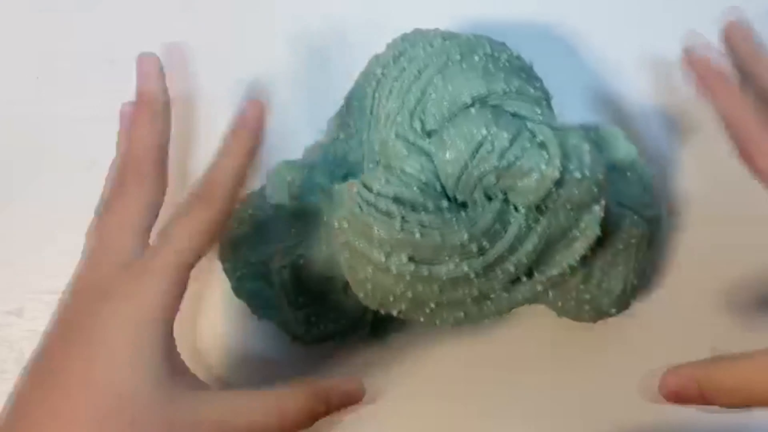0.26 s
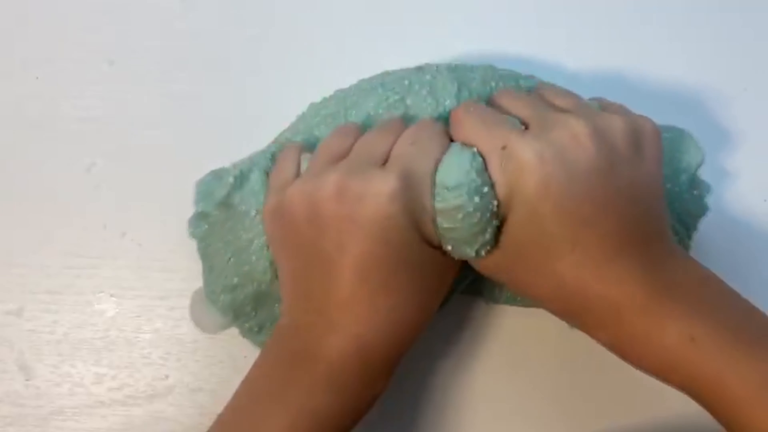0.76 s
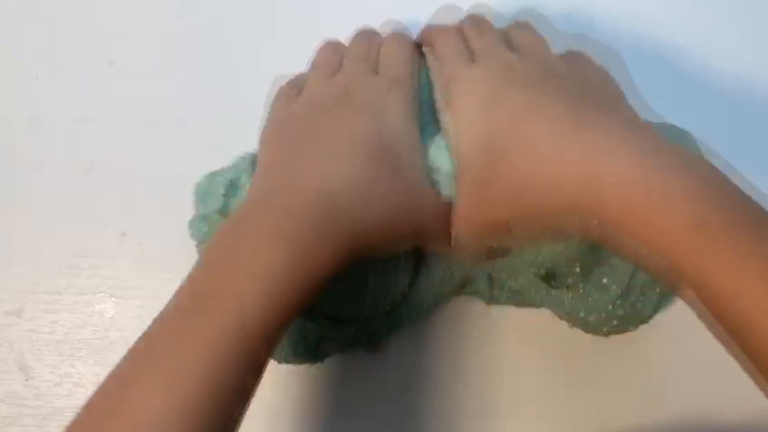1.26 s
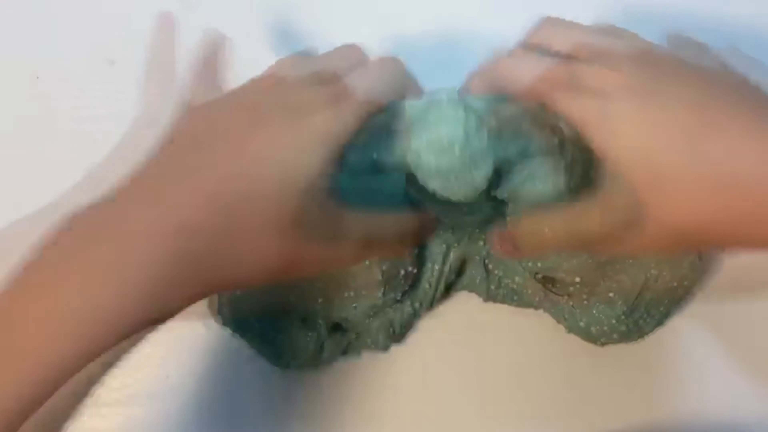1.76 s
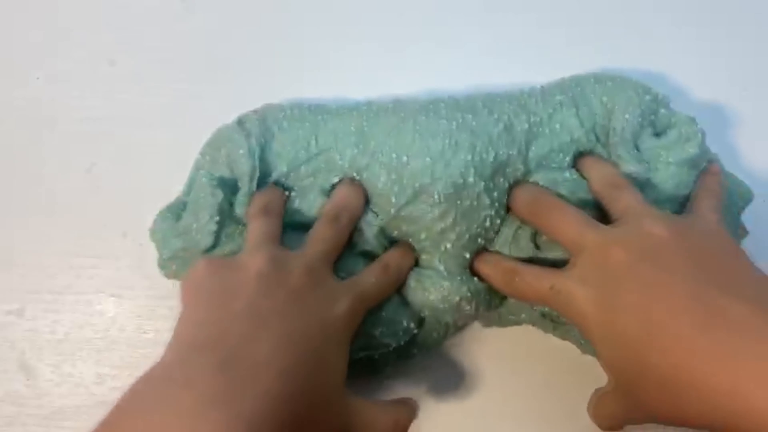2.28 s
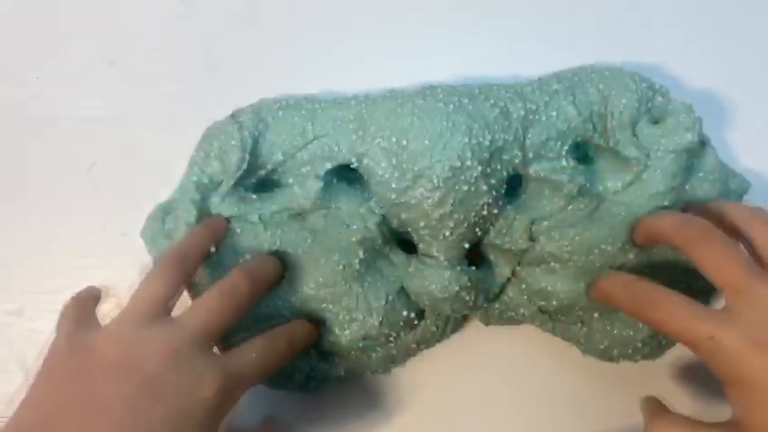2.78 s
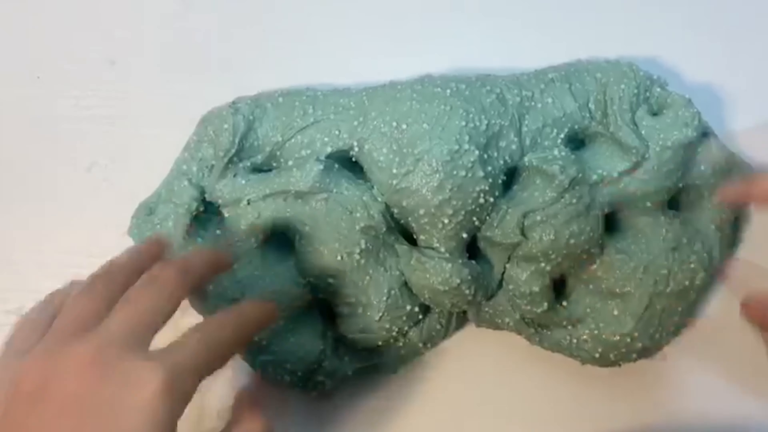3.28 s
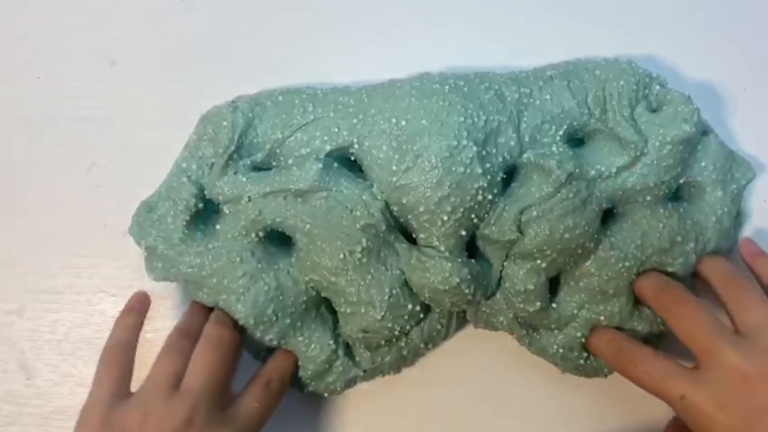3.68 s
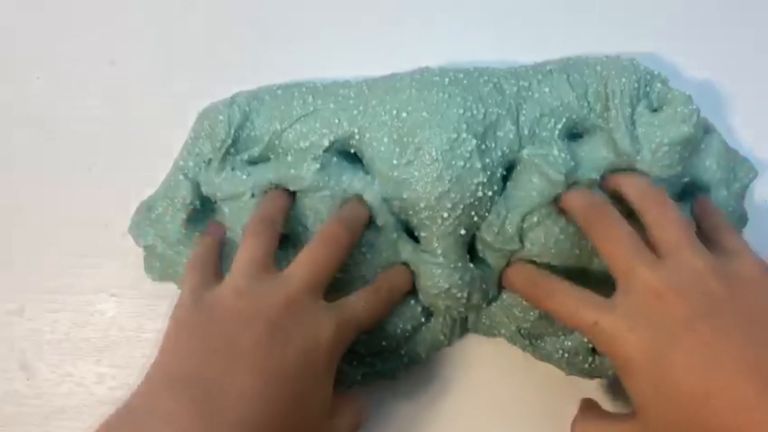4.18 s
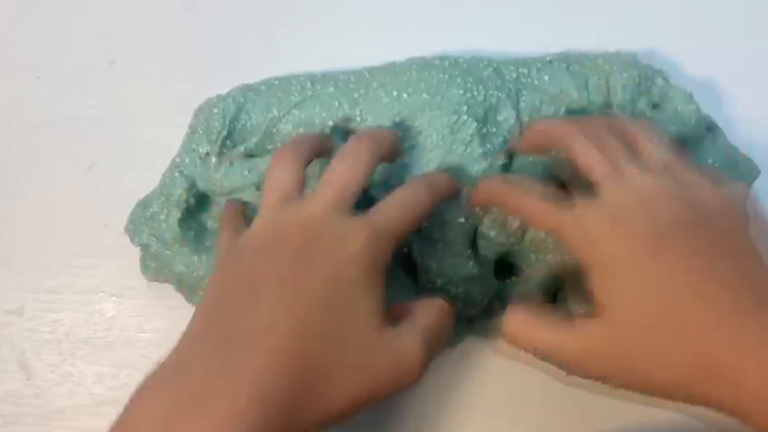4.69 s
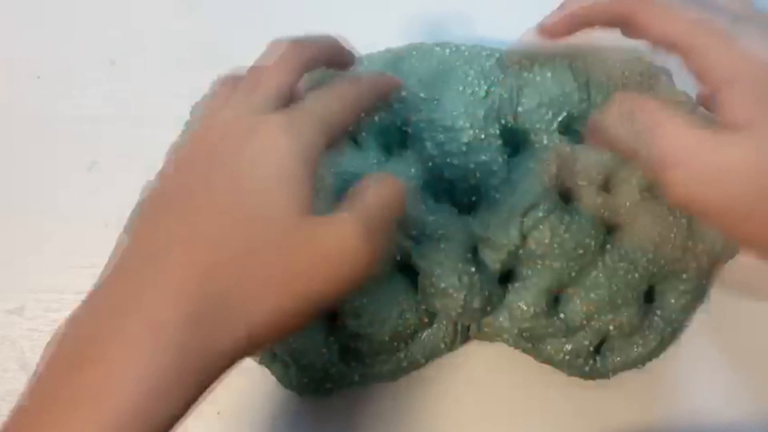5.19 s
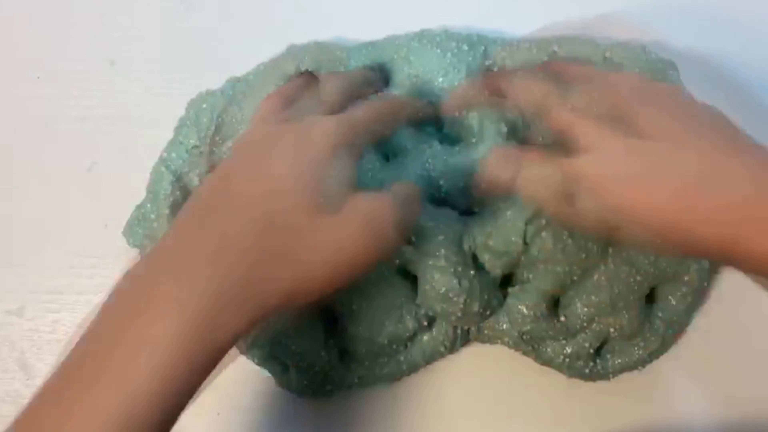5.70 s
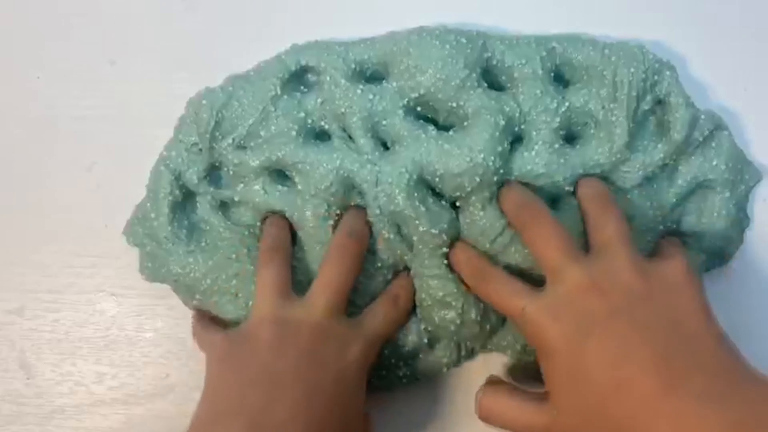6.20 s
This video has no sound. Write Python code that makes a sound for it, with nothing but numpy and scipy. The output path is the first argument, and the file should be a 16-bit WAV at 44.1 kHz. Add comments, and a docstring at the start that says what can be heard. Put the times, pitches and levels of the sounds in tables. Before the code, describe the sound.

Close-up crunchy slime: squelching presses and crackling sticky peels, followed by seven spaced finger pokes, each a dull thud with popping beads.

```python
"""Two hands work a slab of foam-bead slime on a table, close to a two-port microphone in a small quiet room.
For the first two seconds they press it and peel away: crunching beads, wet squelches, sharp sticky snaps.
From 2.5 s the fingers poke in seven times: each touches and sinks with thuds, gulps, a squelch and a burst
of snaps, then lifts out with sticky ticks. Filtered noise, random clicks and short decaying tones make
these sounds; nearby reflections, a wide room tail and still air surround them throughout."""
import sys
import numpy as np
from scipy import signal
from scipy.fft import rfft, irfft, next_fast_len
from scipy.io import wavfile

SR = 44100
rng = np.random.default_rng(int(sys.argv[2]) if len(sys.argv) > 2 else 0)


def dump(signal):
    """Clip the signal to [-1, 1] and save it as 16-bit WAV at the path in sys.argv[1]."""
    limited = np.clip(np.atleast_2d(signal).T, -1, 1)
    pcm = np.round(limited * 32767).astype(np.int16)
    wavfile.write(sys.argv[1], SR, pcm)


N = 284445
TIME = np.arange(N) / SR

# slow presses and soft rubs with the flat hand; levels are set before the layer gains:
# (peak t/s, rise/s, fall/s, crunch level/dB, fold f/Hz, squelch level/dB, fizz level/dB, weight on table level/dB)
FLAT_HAND_PRESSES = [(.008, 0.042, 0.022, -42, 1492, -45, -57.5, -55),
                     (.06, 0.024, 0.048, -58, 2224, -58.5, -62, -59),
                     (.152, 0.032, 0.034, -48, 3042, -47, -51, -40),
                     (0.197, 0.018, 0.0049, -54, 1990, -45, -64, -35),
                     (0.959, 0.016, 0.026, -53.5, 3646, -51.5, -59, -74),
                     (1.006, 0.018, 0.019, -48, 3486, -44, -52, -66),
                     (1.044, 0.019, 0.014, -48.5, 2415, -45, -46, -70),
                     (1.702, 0.016, 0.04, -55, 4530, -51.5, -61, -78),
                     (1.747, .03, 0.024, -50, 1800, -51.5, -55.5, -61),
                     (1.841, 0.036, 0.041, -63, 2460, -57.5, -73.5, -52.5),
                     (3.05, 0.21, 0.3, -87, 2426, -72.5, -93, -68),
                     (3.459, 0.013, 0.0088, -68, 1226, -69, -77.5, -43.5),
                     (3.56, 0.053, 0.076, -73.5, 2190, -85, -83, -77),
                     (3.75, 0.023, 0.04, -86, 1000, -62, -93, -58),
                     (5.533, 0.0065, 0.017, -72.5, 1600, -82, -81, -80)]


def gain_of(db):
    """Decibels to amplitude."""
    return 10 ** (np.asarray(db) / 20)


def evened(x):
    """Scales to unit rms."""
    return x / np.sqrt(np.mean(x ** 2) + 1e-20)


def read(points, hz):
    """Reads a table of (f/Hz, value) on a log-frequency axis."""
    f, value = np.transpose(points)
    return np.interp(np.log(hz + 1), np.log(f + 1), value)


def add(mix, s, sound):
    """Mixes a sound in at time s."""
    part = mix[max(0, round(s * SR)):][:len(sound)]
    part += sound[:len(part)]


def swell(s, rise_s, fall_s, shape=1):
    """An envelope that peaks at time s: pointed for shape 1, rounded for shape 2."""
    distance = abs(TIME - s) / np.where(TIME < s, rise_s, fall_s)
    return np.exp(-np.minimum(distance, 20) ** shape)


def clumps(depth_db, span_s):
    """Pockets give way in little avalanches: a gain that wanders between randomly spaced levels."""
    knots = np.cumsum(rng.exponential(span_s, 6000))
    levels = 2 * rng.random(len(knots)) - 1
    return gain_of(depth_db * np.interp(TIME, knots, levels))


def impulse(db):
    """The sharpest causal click that has this half spectrum, with unit energy."""
    log_gain = np.log(gain_of(np.concatenate([db, db[-2:0:-1]])))
    minimum_phase = np.exp(np.conj(signal.hilbert(log_gain)))
    click = np.fft.ifft(minimum_phase).real
    return click / np.linalg.norm(click)


def colour(x, points, size=2048):
    """Filters x by a relative spectrum, without smearing attacks backwards."""
    spectrum_db = read(points, np.fft.rfftfreq(size, 1 / SR))
    return signal.oaconvolve(x, impulse(spectrum_db))[:N]


def resonate(x, hz, width_hz):
    """A resonance that follows the curve hz: shift it to zero, smooth, and shift back."""
    turn = np.exp(2j * np.pi * np.cumsum(hz) / SR)
    r = np.exp(-np.pi * width_hz / SR)
    return 2 * (turn * signal.lfilter([1 - r], [1, -r], x / turn)).real


def burst(hz, octaves, size=512):
    """A tiny cavity opening: a click of a cycle or two around its own pitch."""
    away = np.log2((np.fft.rfftfreq(size, 1 / SR) + 50) / hz) / octaves
    return impulse(-22 * np.log10(1 + away ** 2))


def crackle(per_s, spread_db, low_hz, high_hz, octaves, clump_db=7.0, count=14):
    """A swarm of bursts at many pitches, with random strengths and signs; unit rms."""
    out = np.zeros(N)
    for hz in np.geomspace(low_hz, high_hz, count):
        size = np.minimum(rng.exponential(1, N), 3.5)
        strength = gain_of(spread_db * size) * rng.choice([-1, 1], N)
        happens = rng.random(N) < per_s / count / SR
        clicks = strength * happens * clumps(clump_db, span_s=0.0034)
        out += signal.oaconvolve(clicks, burst(hz, octaves))[:N] * np.sqrt(hz)
    return evened(out)


def pokes():
    """Touching and sinking each give a squeeze, a gulp and a thud; clinging and lifting give sticky pulls."""
    # fingertips touch the skin of the slab, sink through it, and lift out; levels before the layer gains:
    # (touch t/s, sink t/s, sink fade/s, touch level/dB, crunch level/dB, fold f/Hz, wet level/dB, fizz level/dB,
    #  thud level/dB, table ring level/dB re the sink thud, touch gulp f/Hz, sink gulp f/Hz, lift level/dB)
    finger_pokes = [(2.504, 2.538, 0.0065, -49, -38.5, 4295, -39.5, -40.5, -28.5, 2, 868, 475, -62),
                    (3.2039, 3.248, 0.0079, -40, -40.5, 5330, -36, -32.5, -25.5, 2, 903, 700, -68.5),
                    (3.8393, 3.868, 0.0044, -45.5, -41.5, 1935, -36.5, -39, -26, 1.5, 1209, 700, -67),
                    (4.479, 4.523, 0.015, -45.5, -41.5, 2656, -35, -36, -25, 2, 864, 541, -65.5),
                    (5.106, 5.1359, 0.0096, -46.5, -40.5, 3030, -36.5, -40.5, -27, 2, 906, 592, -83.5),
                    (5.6932, 5.726, 0.021, -46.5, -45.5, 6200, -37.5, -52, -30, 8, 926, 626, -67),
                    (6.279, 6.324, 0.0069, -50.5, -43.5, 3635, -36, -45, -31.5, -2.5, 1035, 762, -78)]
    touch_rise_s, touch_fade_s, sink_rise_s = 0.0046, 0.01, 0.0088
    touch_crunch_db, touch_wet_db, touch_fizz_db = -2.5, 4, -1  # against the touch level
    touch_gulp_lead_s, touch_gulp_db, touch_gulp_fall, touch_gulp_s = 0.005116, 11.5, 0.61, .014
    sink_gulp_lag_s, sink_gulp_db, sink_gulp_fall, sink_gulp_s = .004, 1, .72, .012
    thud_lag_s, touch_thud_hz, sink_thud_hz, sink_thud_db = .015, 100.5, 101, -4
    touch_ring_db = -3  # against the touch thud
    recoil_s = 0.052
    cling_lag_s, cling_rise_s, cling_fade_s, cling_db = 0.03, 0.013, .05, -18
    lift_after_s, lift_rise_s, lift_fade_s = 0.26, 0.03, 0.2
    squeeze, gulp, thud, pull = [], [], [], []
    for (touch, sink, fade, touch_db, crunch_db, fold_hz, wet_db, fizz_db,
         thud_db, ring_db, push_hz, gulp_hz, lift_db) in finger_pokes:
        squeeze.append((touch, touch_rise_s, touch_fade_s, touch_db + touch_crunch_db, fold_hz,
                        touch_db + touch_wet_db, touch_db + touch_fizz_db))
        squeeze.append((sink, sink_rise_s, fade, crunch_db, fold_hz, wet_db, fizz_db))
        # touching pushes air out from under the fingertips; sinking opens a deeper pocket
        gulp.append((touch - touch_gulp_lead_s, touch_db + touch_gulp_db,
                     push_hz, push_hz * touch_gulp_fall, touch_gulp_s))
        gulp.append((sink + sink_gulp_lag_s, wet_db + sink_gulp_db,
                     gulp_hz, gulp_hz * sink_gulp_fall, sink_gulp_s))
        # the slab recoils, so a later second push lands harder on the table
        recoil_db = 20 * np.log10((sink - touch) / recoil_s)
        thud.append((touch + thud_lag_s, thud_db, touch_thud_hz, touch_ring_db))
        thud.append((sink + thud_lag_s, thud_db + sink_thud_db + recoil_db, sink_thud_hz, ring_db))
        # the slime ticks as it closes around the sunk fingers, and again as they lift out
        pull.append((sink + cling_lag_s, cling_rise_s, cling_fade_s, crunch_db + cling_db))
        pull.append((touch + lift_after_s, lift_rise_s, lift_fade_s, lift_db))
    return squeeze, gulp, thud, pull


def squeezes(rows, crunch_db=-5.5, fold_db=-3, fold_width_hz=900, bubbles_db=-9, squelch_db=-3,
             graze_db=-15, graze_s=0.008):
    """Pressure builds and lets go: beads crunch in a pitched fold, bubbles ring, wet folds squelch, air fizzes."""
    # colours of the beads, wet folds and escaping air: (f/Hz, relative level/dB)
    crunch_colour = [(250, -22.5), (600, 0.5), (1200, 10), (2500, 5), (4500, 5.5), (6500, 7), (9000, -17.5),
                     (16000, -40.5)]
    squelch_colour = [(70, -17), (150, -8.5), (230, 4.5), (380, 1.5), (650, -1), (900, -10.5),
                      (1500, -11.5), (4000, -61)]
    fizz_colour = [(2000, -27), (4500, -2), (6500, 2.5), (10500, 2), (13000, -7), (16000, -15.5)]
    power, pitch = np.zeros((3, N)), np.zeros(N)
    for s, rise, fall, beads_db, fold_hz, wet_db, fizz_db in rows:
        # the hand grazes the surface just before each squeeze peaks
        graze = gain_of(graze_db) ** 2 * (TIME < s) * np.exp(-abs(TIME - s) / graze_s)
        levels = gain_of([beads_db, wet_db, fizz_db])[:, None]
        share = levels ** 2 * (swell(s, rise, fall, shape=1.8) + graze)
        power += share
        pitch += fold_hz * share[0]
    crush, wet, leak = np.sqrt(power) * clumps(depth_db=2.5, span_s=0.012)
    crunch = crackle(per_s=1900, spread_db=1.5, low_hz=700, high_hz=6770, octaves=0.59)
    crunch = colour(crunch, crunch_colour)
    # the fold's pitch is the power-weighted mean of the squeezes, with random wander
    fold_curve_hz = pitch / power[0] * clumps(depth_db=3.6, span_s=0.01)
    fold = resonate(crunch, fold_curve_hz, fold_width_hz)
    bubbles = crackle(per_s=1300, spread_db=2, low_hz=800, high_hz=5000, octaves=.1, clump_db=6, count=23)
    squelch = crackle(per_s=1400, spread_db=2.0, low_hz=182, high_hz=1000, octaves=.6)
    squelch = colour(squelch, squelch_colour)
    fizz = crackle(per_s=7000, spread_db=3, low_hz=5000, high_hz=13000, octaves=.5, clump_db=4)
    fizz = colour(fizz, fizz_colour)
    beads = gain_of(crunch_db) * evened(crunch) + gain_of(fold_db) * evened(fold)
    beads = beads + gain_of(bubbles_db) * evened(bubbles)
    return crush * beads + gain_of(squelch_db) * wet * evened(squelch), leak * evened(fizz)


def snaps(rows, cycles=0.56, skirt_db=-8, skirt_ratio=2.1, octaves=0.97, hollow_db=-11, hollow_ratio=0.47,
          hollow_wander_octaves=0.73, hollow_spread_db=-1.0, sputter_s=0.0022, sputter_db=-6,
          tear_s=.0005, tear_db=-5):
    """A sharp snap: a rising tear, a cycle or two of pitch over a lower hollow note, and a brief sputter."""
    out, lead = np.zeros(N), 256  # lead in samples, room for the tear
    t = np.arange(-lead, 2 * lead) / SR

    def short_note(f):
        return evened(np.exp(-(t * f / cycles) ** 2) * np.cos(2 * np.pi * (f * t + rng.random())))

    for s, db, hz in rows:
        shreds = rng.standard_normal(len(t))
        tear = shreds * (t < 0) * np.exp(-abs(t) / tear_s)
        sputter = shreds * (t > 0) * np.exp(-abs(t) / sputter_s)
        instant = evened(1. * (t == 0))
        drive = gain_of(tear_db) * evened(tear) + instant + gain_of(sputter_db) * evened(sputter)
        hollow_hz = hz * hollow_ratio * 2 ** (hollow_wander_octaves * rng.uniform(-1.1, 1))
        note, hollow = short_note(hz), short_note(hollow_hz)
        skirt = evened(np.pad(burst(hz * skirt_ratio, octaves), (lead, 0)))
        hollow_gain = gain_of(hollow_db + hollow_spread_db * rng.standard_normal())
        body = note + hollow_gain * hollow + gain_of(skirt_db) * skirt
        snap = signal.fftconvolve(drive, body)
        # the level is that of the whole snap's energy packed into a millisecond
        add(out, s + 2 * t[0], gain_of(db) * snap / np.linalg.norm(snap) * np.sqrt(SR / 1000))
    return out


def neighbours(rows, count=2):
    """Two further snaps scattered around each, mostly just after and usually weaker, at nearby pitches."""
    lag_s, spread_s = .003, .0055
    below_db, top_db, spread_db, spread_octaves = -12, -42.5, 1.5, 0.072
    chance = rng.standard_normal((len(rows), count, 3))
    weaker = []
    for (s, db, hz), draws in zip(rows, chance):
        for when, size, tone in draws:
            level_db = min(db + below_db, top_db) + spread_db * size
            weaker.append((s + lag_s + spread_s * when, level_db, hz * 2 ** (spread_octaves * tone)))
    return weaker


def gulps(rows):
    """Wet pockets gape: a few cycles that swell quickly and slide in pitch."""
    out = np.zeros(N)
    for s, db, first_hz, last_hz, length in rows:
        age = np.arange(0, 3, 1 / (length * SR))  # in lengths
        hz = last_hz + (first_hz - last_hz) * np.exp(-(age / 0.5) ** 2)
        envelope = np.sqrt(2 * np.e) * age / 1.05 * np.exp(-(age / 0.67) ** 2)
        add(out, s, gain_of(db) * envelope * np.sin(2 * np.pi * np.cumsum(hz) / SR))
    return out


def peeling(rows, ticks_db=-9.5, threads_db=-7.0):
    """Sticky threads part from the skin: separate ticks, filled in by finer ones when the pull is strong."""
    # colour of the parting threads: (f/Hz, relative level/dB)
    sticky_colour = [(100, -32), (400, 9), (1000, -6.5), (2500, -1.5), (4500, -4.5), (7000, 0),
                     (11000, -11), (16000, -18)]
    pull = sum(gain_of(db) * swell(s, rise, fade) for s, rise, fade, db in rows)
    ticks = crackle(per_s=260, spread_db=4.5, low_hz=1100, high_hz=10500, octaves=0.5)
    ticks = evened(colour(ticks, sticky_colour))
    threads = crackle(per_s=15000, spread_db=-0.5, low_hz=503, high_hz=12320, octaves=1.0)
    threads = evened(colour(threads, sticky_colour))
    strain = (pull / gain_of(-56.0)) ** 0.73
    return pull * (gain_of(ticks_db) * ticks + gain_of(threads_db) * strain * threads)


def thuds(rows, cycles=0.83, build_s=0.0045):
    """A soft push of about one cycle, after which the table's modes ring with new phases each time."""
    # what the table rings with: (f/Hz, relative level/dB, t60/s)
    table_modes = [(38.7, -20, 0.5), (51.33, -25, 0.93), (63.3, -23, 0.98), (98, -26, 0.36),
                   (125.3, -5.5, 0.36), (140, -22, 0.5), (152, -14.5, 0.07)]
    out, lead = np.zeros(N), .03  # lead in seconds
    t = np.arange(SR // 2) / SR - lead
    after = np.maximum(t, 0)
    for s, db, hz, ring_db in rows:
        push = -np.cos(2 * np.pi * hz * t) * np.exp(-(t * hz / cycles) ** 2)
        ring = 0
        for f, level, t60 in table_modes:
            ring = ring + gain_of(level - 60 * after / t60) * np.sin(2 * np.pi * (f * after + rng.random()))
        build = 1 - np.exp(-after / build_s)
        add(out, s - lead, gain_of(db) * (push + gain_of(ring_db) * ring * build))
    return out


def shifting(landings):
    """A dull, lumpy rustle as the slab spreads under each press and settles after each thud."""
    # colour of the moving mass: (f/Hz, relative level/dB)
    mass_colour = [(25, -13.5), (50, 6.5), (110, 5), (200, -7), (350, -8), (600, -21.5), (1100, -19.5),
                   (2500, -49.5)]
    settle_db, lag_s, rise_s, fade_s = -20.5, 0.049, 0.026, 0.086
    resting_db = -79  # the slab never quite rests under the hands
    settling = sum((gain_of(db + settle_db) * swell(s + lag_s, rise_s, fade_s)) ** 2
                   for s, db, *_ in landings)
    spreading = sum((gain_of(weight_db) * swell(s, rise, fall, shape=1.6)) ** 2
                    for s, rise, fall, *_, weight_db in FLAT_HAND_PRESSES)
    lumps = rng.standard_normal(N) * clumps(depth_db=16.5, span_s=0.012)
    lumps = colour(lumps, mass_colour, size=4096)
    return np.sqrt(settling + spreading + gain_of(resting_db) ** 2) * evened(lumps)


def bounces(slime):
    """Early reflections off nearby surfaces, whose paths shift as the fingers move."""
    # (nominal delay t/s, level/dB)
    surfaces = [(.0021, -14), (.0041, -22)]
    reach = clumps(depth_db=2.5, span_s=0.039)  # stretches and shortens every delay
    return sum(gain_of(db) * np.interp(TIME - delay * reach, TIME, slime, left=0) for delay, db in surfaces)


def standing_waves(x):
    """The room's low modes hum on after any sound that reaches their pitch."""
    # (f/Hz, level/dB, t60/s)
    low_modes = [(312.7, -2, 0.29), (388, -6, 0.7), (666, -9.5, 0.21)]
    t = np.arange(SR) / SR
    ring = 0
    for hz, db, t60 in low_modes:
        scale = 2 * np.log(1000) / (t60 * SR)
        ring = ring + scale * gain_of(db - 60 * t / t60) * np.sin(2 * np.pi * hz * t)
    return signal.oaconvolve(x, ring)[:N]


def room(x, size=256):
    """A diffuse tail of sparse random taps, each band dying at its own rate."""
    # (f/Hz, t60/s)
    decay = [(100, 0.67), (260, 0.24), (700, 0.24), (1840, 0.29), (4850, 0.27), (12000, 0.22)]
    length = SR * 3 // 4
    taps = rng.standard_normal(length) * (rng.random(length) < .25)
    hz, t, z = signal.stft(taps, SR, nperseg=size)
    fade = gain_of(-60 * t / read(decay, hz)[:, None])
    build = 1 - np.exp(-t / 0.0021)
    tail = signal.istft(z * fade * build, SR, nperseg=size)[1]
    return signal.oaconvolve(x, tail / np.linalg.norm(tail))[:N]


def still_air():
    """The quiet bed of the room: steady noise, strongest in the bass."""
    # (f/Hz, relative level/dB)
    air_colour = [(15, -33.5), (25, -4.5), (72, 2), (141, 0), (200, -10.5), (354, -13.5), (600, -24.5),
                  (1790, -19.5), (4250, -34.5), (6000, -32), (8000, -42.5), (16000, -56.5)]
    noise = colour(rng.standard_normal(N), air_colour, size=8192)
    return gain_of(-78) * evened(noise)


def ports(spot, around):
    """Two ports: bass nearly in phase, treble wide and mostly out of phase; spot and surround lead separately."""
    # (f/Hz, left's lead for a sound from one spot/rad, the same for surrounding sound/rad,
    #  left minus right level/dB)
    port_pair = [(30, 0, 0, -2.2), (130, -.05, -.05, -1.9), (300, -.25, -.25, 1.2), (600, -.7, -.7, .8),
                 (1000, -.35, -.35, -1.5), (1600, 0, 0, -2.5), (2600, .3, .3, -2.6), (4400, .8, .9, -1.5),
                 (5600, 1.5, 1.5, -.7), (6600, 2.1, 2.1, 0), (7500, 2.62, 3.08, 0), (10000, 2.78, 3.12, 0),
                 (12000, 2.65, 3.12, 0), (16000, 2.35, 3.1, 0)]
    size = next_fast_len(N + SR // 10)
    hz, table = np.fft.rfftfreq(size, 1 / SR), np.array(port_pair)
    spot_lead, around_lead, balance_db = (read(np.column_stack([table[:, 0], column]), hz)
                                          for column in table.T[1:])
    heard = 0
    for x, lead in ((spot, spot_lead), (around, around_lead)):
        half = np.exp(.5j * lead) * gain_of(balance_db / 2)  # half to the left, its inverse to the right
        heard = heard + rfft(x, size) * np.array([half, 1 / half])
    return irfft(heard, size)[:, :N]


def scene(snaps_db=-1.0, gulps_db=-1, thuds_db=-1, shift_db=-2, room_db=-14.5, wide_db=-16):
    """The slime, its bounces off nearby surfaces, the room, and still air."""
    # event levels are set before the layer gains
    # sharp snaps, loud and faint, some followed by an echo: (t/s, level over a millisecond/dB, centre f/Hz)
    sharp_snaps = [(.4646, -53, 4270), (.475, -52, 3970), (.5428, -51.5, 2630), (.5478, -43, 8800),
                   (.5908, -39, 2130), (.6, -50.5, 7600), (.6037, -34, 9000), (.658, -21.5, 9700),
                   (.6608, -28.5, 9300), (.6765, -50.5, 8000), (.6335, -52, 3000), (.645, -48, 4200),
                   (.7017, -48.5, 6600), (.7161, -38, 7500), (.7243, -43.5, 4600), (.7335, -40, 5400),
                   (.7436, -35.5, 6960), (.7494, -16, 6300), (.7515, -32.5, 7500), (.7535, -26, 7800),
                   (.7675, -30, 6500), (.7798, -38, 6070), (.7858, -22.5, 6030), (.788, -31.5, 6410),
                   (.7992, -33, 5460), (.8039, -42, 6060), (.826, -42, 6040), (.8603, -46, 5500),
                   (1.2757, -35, 7960), (1.292, -34.5, 3920), (1.3482, -45.5, 9300), (1.363, -48, 7000),
                   (1.3823, -45.5, 5240), (1.4, -55.5, 7500), (1.4115, -18.5, 4520), (1.4213, -32, 4180),
                   (1.4374, -45.5, 7500), (1.4476, -32.5, 5270), (1.4611, -62.5, 7000), (1.508, -33, 7460),
                   (1.5112, -35, 7600), (1.5161, -29.5, 4370), (1.533, -48.5, 3200), (1.5655, -46, 8650),
                   (1.572, -40, 7900), (1.5773, -38, 6400), (1.6202, -42, 6040), (1.6228, -44, 7570),
                   (1.956, -38.5, 5860), (1.9858, -47, 2950), (1.9902, -41, 7700), (2.0311, -50.5, 7600),
                   (2.1214, -53.5, 3660), (2.1683, -52.5, 7200), (2.2098, -31, 6480), (2.3278, -47, 7040),
                   (2.4845, -50, 6630), (2.488, -33.5, 5750), (2.509, -33, 4060), (2.5298, -32.5, 5460),
                   (2.5329, -25, 5100), (2.539, -29.5, 5300), (2.5436, -20.5, 4840), (2.5468, -21.5, 4000),
                   (2.5484, -33, 5000), (2.7529, -52, 6000), (2.8062, -66, 4260), (2.811, -44, 8800),
                   (2.868, -53, 5560), (2.9147, -56.5, 4470), (3.0238, -62.5, 6740), (3.068, -62, 7500),
                   (3.099, -54.5, 2780), (3.1097, -58.5, 4100), (3.149, -56.5, 7600), (3.2037, -25.5, 5200),
                   (3.2084, -31, 3860), (3.2183, -20, 8350), (3.2294, -20.5, 2230), (3.2381, -32.5, 5200),
                   (3.2454, -23.5, 5450), (3.2503, -17.5, 6600), (3.4451, -43.5, 1860),
                   (3.5074, -48.5, 2770), (3.608, -52, 1510), (3.662, -61, 4500), (3.8362, -30.5, 6870),
                   (3.8503, -22.5, 7800), (3.8618, -29.5, 3640), (3.8657, -38, 5020), (4.1045, -48.5, 9360),
                   (4.1496, -44.5, 7700), (4.1558, -44, 5600), (4.1629, -44.5, 7400), (4.2208, -54, 6900),
                   (4.2831, -46.5, 4360), (4.341, -60, 8050), (4.4796, -20, 5940), (4.5029, -35.5, 4240),
                   (4.5124, -17, 3150), (4.5166, -37, 2600), (4.5285, -18, 8700), (4.5338, -29.5, 2530),
                   (4.5367, -22, 3440), (4.728, -62, 4460), (4.7648, -52, 9750), (4.7742, -67, 9050),
                   (4.8056, -49, 8800), (4.8588, -56, 9100), (4.9488, -56.5, 7060), (4.965, -62, 5000),
                   (5.1073, -27.5, 3020), (5.1315, -36, 3000), (5.1336, -24, 6900), (5.1367, -43, 3560),
                   (5.1549, -34, 2280), (5.4047, -63.5, 9940), (5.495, -65.5, 7000), (5.5266, -62.5, 1785),
                   (5.531, -65.5, 3000), (5.5646, -65.5, 5300), (5.6924, -35, 8730), (5.6957, -21.5, 7500),
                   (5.7154, -22, 9630), (5.7177, -30, 9000), (5.7221, -29, 7640), (5.7305, -22, 8740),
                   (5.9877, -51.5, 7440), (5.9935, -51, 6480), (6.0132, -40, 6760), (6.0242, -48.5, 9550),
                   (6.0829, -53, 6300), (6.1122, -52, 5240), (6.2781, -49, 5700), (6.2919, -34, 5800),
                   (6.3134, -28, 8750), (6.3164, -28, 5540), (6.3215, -42, 6050), (6.3256, -25.5, 2400),
                   (6.3279, -29, 1530), (6.362, -39, 2510)]
    # the largest wet pockets gaping: (t/s, level/dB, first f/Hz, last f/Hz, length scale/s)
    wet_pockets = [(.018, -47.5, 379, 270, 0.016), (.146, -46.5, 330, 232, 0.017),
                   (.166, -32, 205, 168, 0.026), (.187, -35.5, 190, 147, 0.012),
                   (.352, -51.5, 200, 140, 0.014), (.7505, -32, 700, 376.5, 0.0043),
                   (.923, -47.5, 1080, 450, 0.0095), (1.024, -40, 357, 276, 0.024),
                   (1.411, -28.5, 1000, 315, 0.0056), (1.621, -50, 797, 200, 0.011),
                   (2.514, -38.5, 330, 227, 0.018), (2.551, -28.5, 420, 331.3, 0.015),
                   (2.562, -39, 303, 221, 0.029), (3.212, -39, 380, 250, 0.018),
                   (3.23, -24, 790, 576, 0.008), (3.25, -37.5, 400, 252, 0.023),
                   (4.518, -30, 462, 361.4, 0.019), (4.541, -36, 446, 378, 0.02),
                   (5.146, -37.5, 423.6, 284, 0.024), (5.701, -36.5, 383.5, 243, 0.012),
                   (5.738, -44.5, 393, 280, 0.027), (6.335, -36, 351, 220, 0.024)]
    # the palms peel off between presses: (strongest pull t/s, rise/s, fade/s, level/dB)
    palm_pulls = [(.54, 0.041, 0.29, -59), (.67, 0.061, 0.2, -55.5), (.79, 0.048, 0.052, -58),
                  (1.29, 0.023, 0.6, -55), (1.575, 0.016, 0.013, -55.5), (2.0, 0.045, 0.027, -68)]
    # palms and knuckles landing, felt through the table: (t/s, level/dB, f/Hz, table ring level/dB re the thud)
    hand_landings = [(.09, -38, 105, -3.5), (.164, -37, 140, -2), (.207, -44, 129, -7.5),
                     (.27, -45.5, 108, -7), (.375, -40, 98, -10), (.516, -39.5, 101, -5),
                     (.941, -37.5, 105, -1.5), (1.051, -43, 92.6, -1.5), (1.637, -43.5, 108, 3.5),
                     (2.758, -53, 96.2, -2), (3.114, -48, 108, 3), (3.46, -33, 105, -3)]
    # colour of the wide room tail, weak in the treble: (f/Hz, relative level/dB)
    wide_colour = [(100, 0.5), (400, 9.5), (1000, 11), (5000, -3.5), (6500, 1), (8000, -32), (16000, -17.5)]
    squeeze, gulp, thud, pull = pokes()
    press_squeezes = [press[:-1] for press in FLAT_HAND_PRESSES]
    crush, fizz = squeezes(press_squeezes + squeeze)
    slime = gain_of(snaps_db) * snaps(sharp_snaps + neighbours(sharp_snaps))
    slime = slime + gain_of(gulps_db) * gulps(wet_pockets + gulp)
    slime = slime + crush + peeling(palm_pulls + pull)
    bounced = bounces(slime)
    low = gain_of(thuds_db) * thuds(hand_landings + thud)
    low = low + gain_of(shift_db) * shifting(hand_landings + thud)
    # the fizz is spread wide, with the same port leads as the reflections
    whole = slime + bounced + fizz
    around = fizz + bounced + gain_of(room_db) * room(whole) + standing_waves(whole)
    # a wide room tail, independent in each channel and weak in the treble
    tail_input = colour(whole, wide_colour)
    wide = gain_of(wide_db) * np.array([room(tail_input), room(tail_input)])
    return ports(slime + low + still_air(), around) + wide


def record(dry):
    """The microphone rings briefly near 10 kHz after each click and dulls the top; then the band limit."""
    # the ports' resonance with a notch above: (f/Hz, relative level/dB)
    port_response = [(20, 2.5), (7000, -1.6), (8500, -1), (10000, 2.5), (11600, .5), (12400, -10),
                     (13200, -20), (14600, -13), (15500, -16), (16000, -22)]
    heard = gain_of(-3) * np.array([colour(side, port_response) for side in dry])
    edge = signal.firwin(511, 16500, window=("kaiser", 9), fs=SR)  # low-pass edge in Hz
    return signal.oaconvolve(heard, edge[None], "same")


dry = scene()
out = record(dry)
dump(out)
```